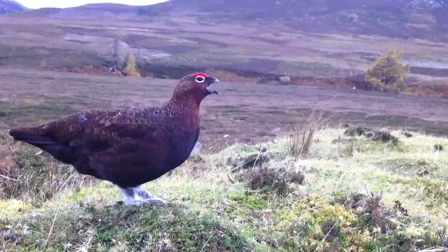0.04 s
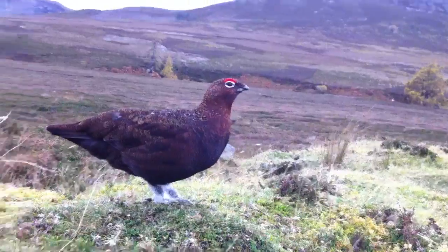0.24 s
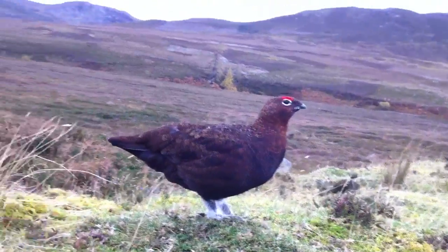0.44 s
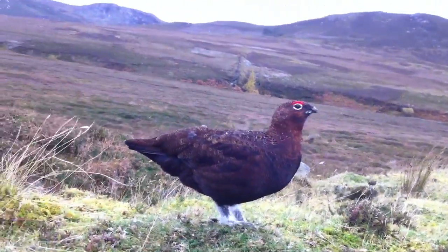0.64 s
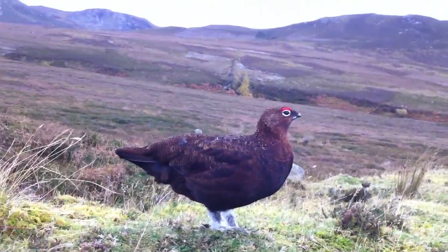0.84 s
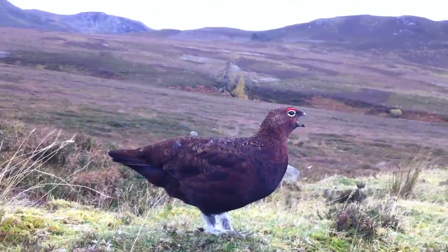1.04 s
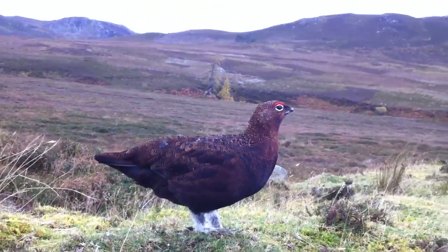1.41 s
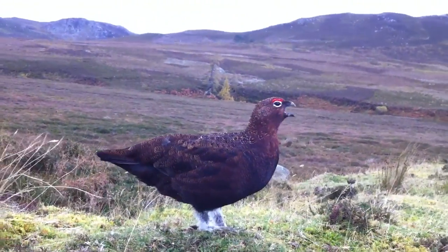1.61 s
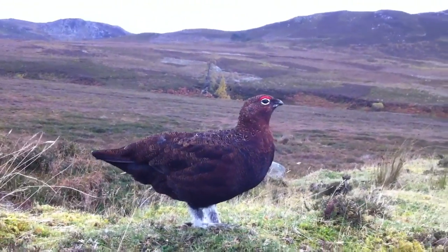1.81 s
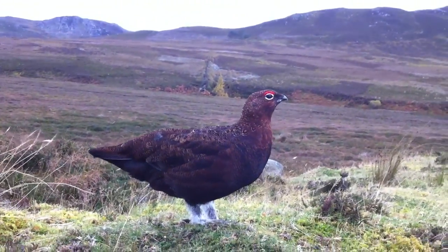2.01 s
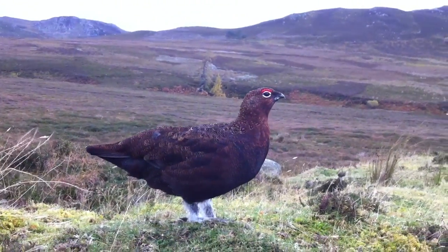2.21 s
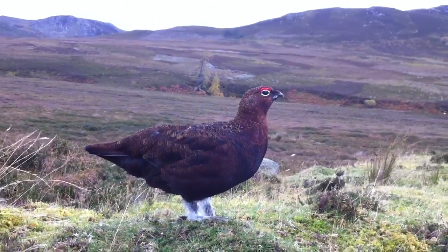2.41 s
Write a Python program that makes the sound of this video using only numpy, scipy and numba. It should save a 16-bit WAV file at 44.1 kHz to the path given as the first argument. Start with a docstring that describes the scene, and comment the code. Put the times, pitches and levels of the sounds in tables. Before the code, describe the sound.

A red grouse gives four short, harsh calls close by on open moorland, at about 0.2, 0.7, 1.2 and 1.8 seconds, the first slightly softer. Each starts with a thin rasp, peaks nasally and sinks into a slowing croak. Gusty wind rumbles over a faint hiss throughout, thumping the microphone hardest near 0.4 seconds. Faint dry ticks come around 1.5 seconds, and the wind continues until about 2.6 seconds.

```python
"""Gusty wind rumbles over a steady hiss; single eddies thump through the microphone's bass cut.
A red grouse gives four harsh calls close by on open moorland. Each is a slow pulse train ringing
the throat: a thin rasp, a loud nasal peak, then a croak that slows and sinks.
A few faint, dry ticks sound in the second half."""
import sys
import numpy as np
from scipy import signal
from scipy.fft import rfft, irfft
from scipy.io import wavfile
from numba import njit

SR = 44100
rng = np.random.default_rng(int(sys.argv[2]) if len(sys.argv) > 2 else 0)


def to_wav(s):
    """Save 16-bit WAV."""
    ch = np.atleast_2d(s).T  # columns
    pcm = np.round(np.clip(ch, -1, 1) * 32767)  # PCM
    wavfile.write(sys.argv[1], SR, pcm.astype(np.int16))


N = 112454

# gust envelope: t/s, level/dB
GUSTS = [(0, -37), (.05, -44), (.11, -32), (.23, -38), (.34, -35), (.38, -38), (.46, -30), (.54, -43),
         (.61, -37), (.72, -37), (.8, -40), (.86, -31), (.93, -31), (.97, -42), (1.08, -30), (1.17, -34),
         (1.28, -30), (1.4, -42), (1.47, -36), (1.55, -41), (1.64, -32), (1.71, -37), (1.79, -31),
         (1.86, -36), (1.97, -30), (2.03, -42), (2.15, -37), (2.28, -36), (2.41, -41), (2.55, -37)]
# rumble spectrum: f/Hz, relative density/dB
RUMBLE_SPECTRUM = [(20, -53), (40, -38.5), (62, -19.5), (100, -8.5), (135, -1.5), (180, -1), (250, -9),
                   (330, -14.5), (450, -27.5), (650, -36), (1000, -48.5), (2000, -71)]
RUMBLE_GAIN_DB, FLUTTER_HZ, FLUTTER_DB = 1, 44.28, 3
# hiss spectrum: f/Hz, relative density/dB
HISS_SPECTRUM = [(100, 10), (700, 12), (1500, 11.5), (3000, 4), (6000, 2.5), (10000, -2), (16000, -2)]
# eddies on the microphone: t/s, peak level/dB, pressure half-width/ms
EDDIES = [(.111, -16.5, 0.88), (0.401, -21.5, 2), (0.4225, -20.5, 2.1), (.433, -12, 0.75),
          (0.4392, -6.5, 0.34), (0.448, -10.5, 0.83), (.473, -15.5, 1.8), (.756, -24.5, 1.6),
          (.850, -21.5, 0.92), (.866, -29, 0.84), (0.935, -27, .8), (1.015, -17.5, 1.13),
          (1.053, -30.5, 2.8), (1.088, -24, 1.04), (1.104, -21, 0.87), (1.265, -19, 0.99),
          (1.325, -19, 1.64), (1.524, -20.5, 1.71), (1.577, -21, 1.57), (1.6391, -14.5, 0.83),
          (1.67, -16.5, 1.78), (1.956, -21, 1.4), (2.086, -33.5, 0.94), (2.212, -29, 1.32),
          (2.292, -25, 2.7), (2.487, -27.5, 2.5)]
HISS_DB, BASS_CUT_HZ, TOP_HZ = -66.5, 159, 15800

# calls: peak t/s, gain/dB, pulse rate ratio, throat tuning ratio
CALLS = [(.1864, -3, .89, .965), (.7118, 0, .975, .995), (1.2183, 0, 1.0, 1.0), (1.7674, 1, 1.02, 1.01)]
# effort in a call: t/s from peak, closing beat level/dB, opening snap level/dB
EFFORT = [(-.066, -31, -22), (-.052, -26, -6), (-.028, -22, -4), (-.02, -7, -3), (-.007, -1, 1), (0, 0, 1),
          (.008, -1, -9), (.03, -6, -13), (.06, -10, -13), (.078, -23, -28), (.096, -24, -32)]
# base pulse rate: t/s from peak, f/Hz
PULSE_RATE = [(-.05, 127), (-.03, 128), (-.02, 143), (-.003, 147), (.008, 123), (.021, 106), (.055, 94),
              (.09, 76)]
# base throat resonances: t/s from peak, f1/Hz, f2/Hz, f3/Hz, f4/Hz
FORMANT_TRACKS = [(-.06, 760, 1500, 2150, 2900), (-.03, 820, 1500, 2200, 2700),
                  (-.015, 990, 1400, 2130, 2880), (0, 1080, 1600, 2010, 3100),
                  (.025, 1100, 1550, 1860, 3240), (.052, 1090, 1380, 1780, 3280),
                  (.095, 900, 1200, 1450, 3200)]
# the same four resonances: stage width/Hz, gain/dB
FORMANT_BANDS = [(300, 0), (400, -9), (310, -2), (270, -16)]
# rasp filter: f/Hz, gain/dB
RASP_SPECTRUM = [(300, -6.5), (700, 11), (1300, 5.5), (2200, 10.5), (2600, -17.5), (3900, -13.5),
                 (4700, -7.5), (5500, -9.5), (6500, -9), (7600, -17), (10000, -22), (16000, -35)]
CALL_START_S, CALL_END_S, SNAP_LEAD_S = -.069, .098, .0022
JITTER_CYCLES, SHIMMER_DB, PUFF_DECAY_S = .01, .7, .002
VOICE_DB, SNAP_IN_VOICE_DB, AIR_IN_VOICE_DB = 15, -19, -35
RASP_DB, BEAT_IN_RASP_DB, AIR_IN_RASP_DB = -14, -17, -18
CHEST_HZ, CHEST_WIDTH_HZ, CHEST_DB = 540, 450, -11
BEAK_HZ, BEAK_WIDTH_HZ, BEAK_DB = 4550, 600, -35
THROAT_TOP_HZ, CLOSING_DB_PER_S = 3400, 110
SCATTER_DB, SCATTER_T60_S = -8, .055

# ticks: t/s, burst level/dB, centre f/Hz
TICKS = [(1.399, -44, 2500), (1.412, -32, 2220), (1.427, -40, 2560), (1.520, -29.5, 2320),
         (1.560, -27, 1140), (1.585, -35.5, 1580), (2.334, -48.5, 3500)]
TICK_DECAY_S, TICK_WIDTH_RATIO = .001, .3


def undb(db):
    """Decibels to gain."""
    return 10 ** (np.asarray(db) / 20)


def unit_rms(x):
    """Scale to rms 1."""
    return x / np.sqrt(np.mean(x ** 2))


def add(out, x, start_s):
    """Mix x into out."""
    i = max(int(round(start_s * SR)), 0)
    out[i:i + len(x)] += x[:len(out) - i]


def butter(x, hz, kind, order):
    """Low-pass or high-pass."""
    return signal.sosfilt(signal.butter(order, hz, kind, fs=SR, output="sos"), x)


def colour(x, spectrum, size=4096):
    """Minimum-phase filter through (f/Hz, gain/dB) points."""
    hz, db = np.array(spectrum, float).T
    bins_hz = np.arange(size // 2 + 1) * SR / size
    gain = undb(np.interp(np.log(bins_hz + 1), np.log(hz), db))
    cepstrum = irfft(np.log(gain))
    cepstrum[1:size // 2] *= 2
    cepstrum[size // 2 + 1:] = 0
    return signal.fftconvolve(x, irfft(np.exp(rfft(cepstrum))))[:len(x)]


@njit
def resonate(x, hz, width_hz):
    """State-variable band-pass, gain 1 at its moving centre."""
    y, band, low = np.empty(len(x)), 0., 0.
    for i in range(len(x)):
        g, damping = np.tan(np.pi * hz[i] / SR), width_hz / hz[i]
        v = (band + g * (x[i] - low)) / (1 + g * (g + damping))
        band, low = 2 * v - band, low + 2 * g * v
        y[i] = damping * v
    return y


def formant(x, hz, width_hz):
    """Two band-pass stages, for deep valleys."""
    hz = hz + np.zeros(len(x))
    return resonate(resonate(x, hz, float(width_hz)), hz, float(width_hz))


def impulses(t, times_s, gains):
    """Band-limited impulses on axis t."""
    lag_samples = (t - times_s[:, None]) * SR
    return gains @ (np.sinc(lag_samples) * np.exp(-(lag_samples / 8) ** 2))


def wind():
    """Turbulence on the microphone: a fluttering rumble that follows the gusts."""
    t = np.arange(N) / SR
    gust_db = np.interp(t, *np.array(GUSTS).T)
    noise = rng.standard_normal(N)
    flutter = np.interp(t * FLUTTER_HZ, np.arange(1024), rng.standard_normal(1024))
    turbulence = noise * undb(FLUTTER_DB * flutter)
    return unit_rms(colour(turbulence, RUMBLE_SPECTRUM)) * undb(gust_db + RUMBLE_GAIN_DB)


def hiss():
    """Steady coloured noise."""
    return undb(HISS_DB) * unit_rms(colour(rng.standard_normal(N), HISS_SPECTRUM))


def eddies():
    """Rounded pressure peaks ring the microphone's bass cut; narrow ones sound sharper."""
    out, t = np.zeros(N), np.arange(-SR // 20, SR // 20) / SR
    for time_s, peak_db, half_width_ms in EDDIES:
        pressure = np.hanning(len(t)) / (1 + (1000 * t / half_width_ms) ** 2)
        thump = butter(pressure, BASS_CUT_HZ, "high", order=4)
        add(out, undb(peak_db) * thump / np.abs(thump).max(), time_s + t[0])
    return out


def pulses(t, rate_ratio):
    """Each cycle snaps open, then shuts with a beat; timing and level vary slightly."""
    effort_s, beat_db, snap_db = np.array(EFFORT, float).T
    phase_cycles = np.cumsum(np.interp(t, *np.array(PULSE_RATE).T)) * rate_ratio / SR
    phase_cycles -= np.interp(0, t, phase_cycles)
    cycles = np.arange(-12, 14)
    jitter, beat_shimmer, snap_shimmer = rng.standard_normal((len(cycles), 3)).T
    times_s = np.interp(cycles + JITTER_CYCLES * jitter, phase_cycles, t)
    inside = (times_s > CALL_START_S) & (times_s < CALL_END_S)
    snap_gains = inside * undb(np.interp(times_s, effort_s, snap_db) + SHIMMER_DB * snap_shimmer)
    beat_gains = inside * undb(np.interp(times_s, effort_s, beat_db) + SHIMMER_DB * beat_shimmer)
    return impulses(t, times_s - SNAP_LEAD_S, snap_gains), impulses(t, times_s, beat_gains)


def puffs(train):
    """A decaying burst of air noise per pulse."""
    envelope = signal.lfilter([1], [1, -np.exp(-1 / (PUFF_DECAY_S * SR))], train)
    return envelope * rng.standard_normal(len(train))


def rasp(snaps, beats):
    """Thin, breathy edge, mostly from the opening snaps."""
    edges = snaps + undb(BEAT_IN_RASP_DB) * beats
    return undb(RASP_DB) * colour(edges + undb(AIR_IN_RASP_DB) * puffs(edges), RASP_SPECTRUM)


def voice(t, snaps, beats, tuning):
    """Pulses, mostly the closing beats, ring the moving throat, chest and beak."""
    drive = beats + undb(SNAP_IN_VOICE_DB) * snaps + undb(AIR_IN_VOICE_DB) * puffs(beats)
    track_s, *tracks_hz = np.array(FORMANT_TRACKS, float).T
    rings = [undb(db) * formant(drive, tuning * np.interp(t, track_s, hz), width_hz)
             for hz, (width_hz, db) in zip(tracks_hz, FORMANT_BANDS)]
    closing = undb(-CLOSING_DB_PER_S * np.maximum(t, 0))  # f3, f4 fade as the beak shuts
    throat = sum(rings[:2]) + closing * sum(rings[2:])
    chest = undb(CHEST_DB) * formant(drive, CHEST_HZ, CHEST_WIDTH_HZ)
    beak = undb(BEAK_DB) * formant(drive, BEAK_HZ, BEAK_WIDTH_HZ)
    return undb(VOICE_DB) * (butter(throat + chest, THROAT_TOP_HZ, "low", order=8) + beak)


def grouse():
    """Four calls plus a short, faint scatter from nearby ground."""
    direct, t = np.zeros(N), np.arange(-SR // 10, SR // 7) / SR
    for peak_s, gain_db, rate_ratio, tuning in CALLS:
        snaps, beats = pulses(t, rate_ratio)
        call = voice(t, snaps, beats, tuning) + rasp(snaps, beats)
        add(direct, undb(gain_db) * call, peak_s + t[0])
    age_s = np.arange(SR // 10) / SR
    scatter = rng.standard_normal(len(age_s)) * undb(-60 * age_s / SCATTER_T60_S)
    scatter /= np.linalg.norm(scatter)
    return direct + undb(SCATTER_DB) * signal.fftconvolve(direct, scatter)[:N]


def ticks():
    """Tiny dry clicks: band-passed noise bursts."""
    out, t = np.zeros(N), np.arange(SR // 50) / SR
    for time_s, db, hz in TICKS:
        burst = rng.standard_normal(len(t)) * np.exp(-t / TICK_DECAY_S)
        tick = resonate(burst, np.full(len(t), float(hz)), TICK_WIDTH_RATIO * hz)
        add(out, undb(db) * tick, time_s)
    return out


def scene():
    """All sources at one microphone."""
    return (hiss() + grouse() + wind() + eddies() + ticks())[None]


def record(dry):
    """The recorder's steep treble cut."""
    return signal.sosfilt(signal.ellip(10, rp=.2, rs=70, Wn=TOP_HZ, fs=SR, output="sos"), dry)


dry = scene()
out = record(dry)
to_wav(out)
```